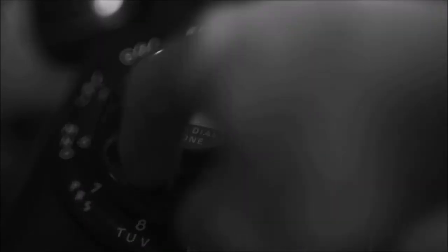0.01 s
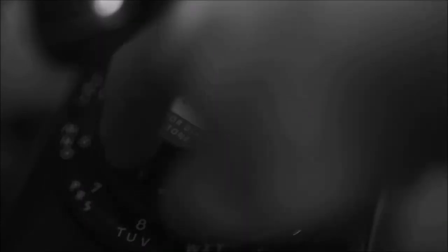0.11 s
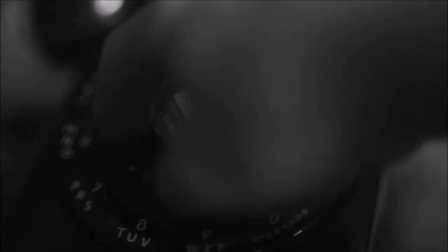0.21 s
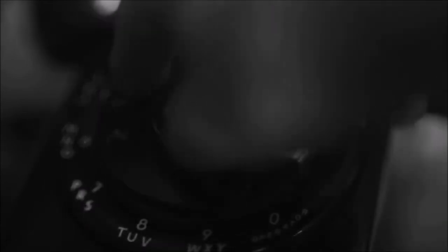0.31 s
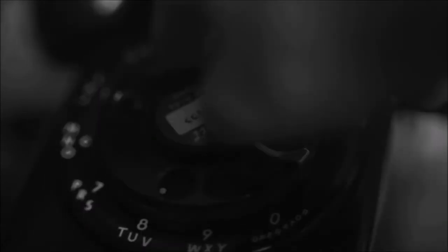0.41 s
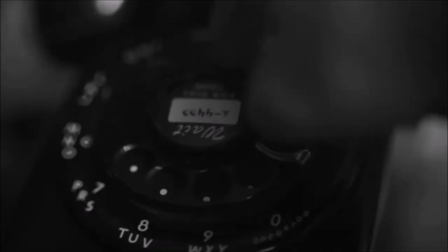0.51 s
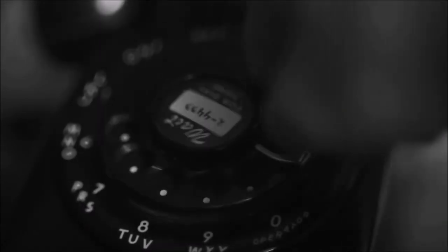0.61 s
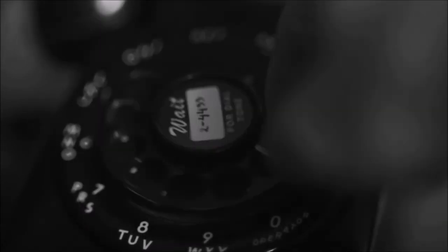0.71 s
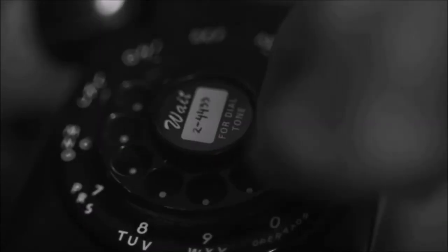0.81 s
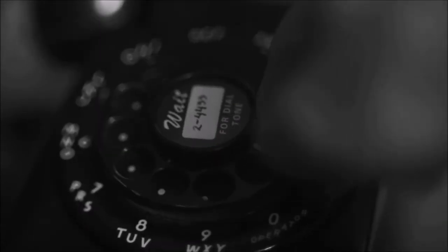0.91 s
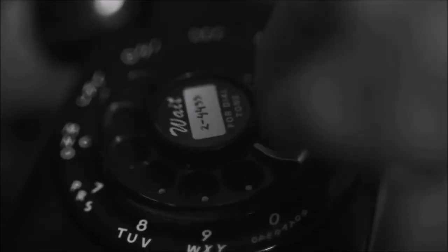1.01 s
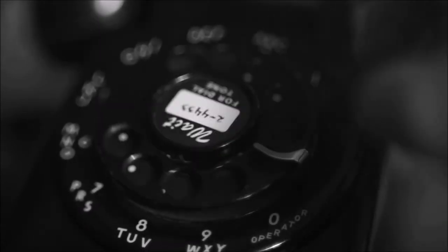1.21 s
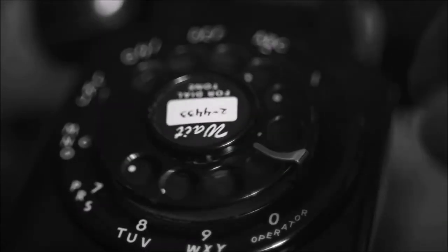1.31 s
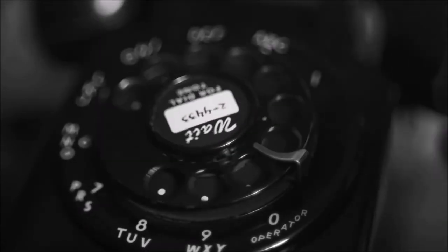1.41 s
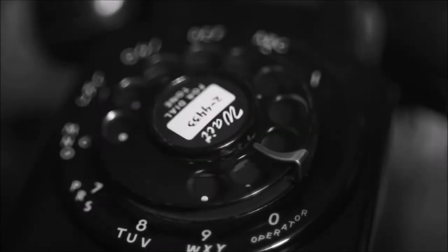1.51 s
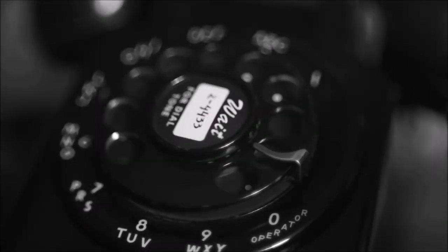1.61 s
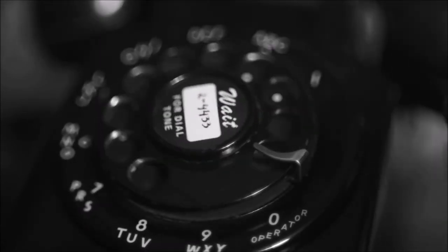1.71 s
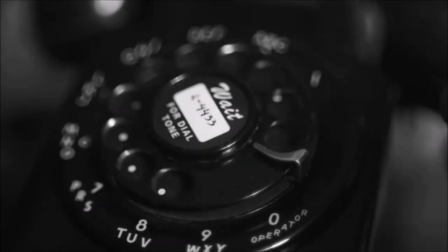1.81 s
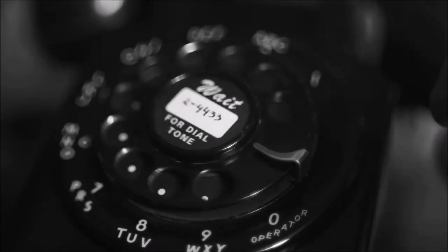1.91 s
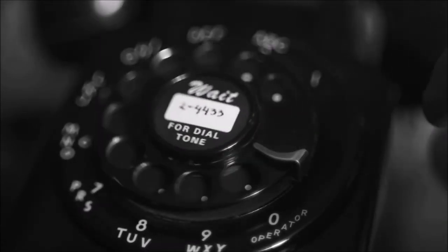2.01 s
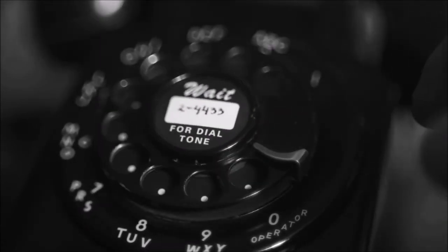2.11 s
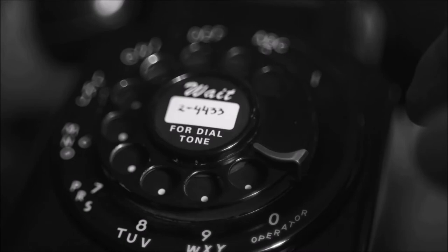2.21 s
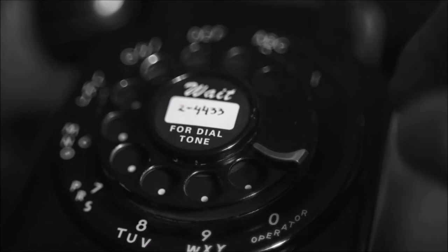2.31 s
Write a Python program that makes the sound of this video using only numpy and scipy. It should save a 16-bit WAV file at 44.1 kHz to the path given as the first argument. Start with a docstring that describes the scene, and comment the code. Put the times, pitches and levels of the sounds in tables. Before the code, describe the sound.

One digit dialed on a rotary phone: ratcheting wind-up, then a whirring, evenly clicking return.

```python
"""A ratchet clicks as a finger winds the wheel of an old rotary telephone to dial one digit.
The microphone is close by, in a small room with a faint mains hum. The finger meets the metal
finger stop and lets go. The wheel runs back on whirring gears, a contact snapping eight times
a second, and hits its rest stop with a thin metal ring and a soft thud of the case."""
import sys
import numpy as np
from scipy import signal
from scipy.fft import rfft, irfft, next_fast_len
from scipy.io import wavfile
from scipy.ndimage import uniform_filter1d, map_coordinates

SR = 44100
rng = np.random.default_rng(int(sys.argv[2]) if len(sys.argv) > 2 else 0)


def put_to_file(sound):
    """Save the sound as 16-bit audio at rate SR, in the file named by the first command-line argument."""
    columns = np.atleast_2d(sound).T  # one column per channel
    safe = np.clip(columns, -1, 1)
    whole_steps = np.round(safe * 32767)
    wavfile.write(sys.argv[1], SR, whole_steps.astype(np.int16))


N = 103635

# Resonances of the telephone's case. Each row: frequency in Hz, width in Hz, gain in dB.
CASE_MODES = [(426, 19, 7), (465, 23, 1), (532, 19, 5), (627, 51, -7), (785, 22, -5), (925, 69, -11),
              (1095, 35, -6), (1195, 50, -4.5), (1487, 28, -3), (1595, 35, -5), (1715, 52, -6),
              (1845, 37, 0), (1924, 180, -11.5)]


def amp(db):
    """Decibels to gain."""
    return 10 ** (np.asarray(db) / 20)


def unit(x):
    """Scaled to rms 1."""
    return x / np.sqrt(np.mean(x ** 2) + 1e-20)


def along(points, hz):
    """(Hz, value) points read on a log axis."""
    f, values = np.transpose(points)
    return np.interp(np.log(hz + 1), np.log(f + 1), values)


def envelope(points):
    """Gain per sample from (s, dB) points."""
    return amp(np.interp(np.arange(N) / SR, *np.transpose(points)))


def wobble(per_s):
    """A smooth random curve."""
    knots = rng.standard_normal(int(N * per_s / SR) + 4)
    return map_coordinates(knots, [np.arange(N) * per_s / SR])


def filtered(x, response):
    """x times a response of frequency."""
    size = next_fast_len(N + SR // 2)
    return irfft(rfft(x, size) * response(np.fft.rfftfreq(size, 1 / SR)), size)[:N]


def coloured(x, tone):
    """x filtered by a curve of (Hz, dB) points, at rms 1."""
    return unit(filtered(x, lambda hz: amp(along(tone, hz))))


def impulse(db):
    """The minimum-phase response that has the given spectrum."""
    cepstrum = irfft(np.log(amp(db)))
    half = len(cepstrum) // 2
    cepstrum[1:half] *= 2
    cepstrum[half + 1:] = 0
    return irfft(np.exp(rfft(cepstrum)))


def add(track, s, sound):
    """Mix a sound in at time s."""
    part = track[max(0, round(s * SR)):][:len(sound)]
    part += sound[:len(part)]


def resonances(modes, f):
    """Response of a body with the given (Hz, width, dB) resonances."""
    return sum((-1) ** k * amp(db) * 1j * f * width / (hz * hz - f * f + 1j * f * width)
               for k, (hz, width, db) in enumerate(modes))


def frame_db(hz):
    """The metal frame's resonances colour the parts mounted on it."""
    # Each row: frequency in Hz, width in Hz, boost in dB.
    modes = [(2934, 670, 10), (4680, 74, 11.5), (6720, 240, 5), (7410, 240, 10.5), (7600, 140, 9),
             (8900, 400, 13.5), (9460, 320, 9), (10770, 530, 5.5), (11070, 260, 7), (12350, 210, -1),
             (14200, 1000, 0.5)]
    return sum(db / (1 + (2 * (hz - centre) / width) ** 2) for centre, width, db in modes)


def room(x, wet_db, wall_s=0.0238, wall_db=-22):
    """Direct sound at the microphone, the nearest wall's echo and a tail whose treble dies first."""
    # Each row: frequency in Hz, t60 in seconds.
    decay = [(200, 0.19), (1500, 0.24), (7000, 0.16), (14000, 0.11)]
    hz, t, spectra = signal.stft(rng.standard_normal(SR // 3), SR, nperseg=256)
    tail = signal.istft(spectra * amp(-60 * t / along(decay, hz)[:, None]), SR, nperseg=256)[1]
    tail *= np.clip(np.arange(len(tail)) / SR / 0.0015 - 1, 0, 1)
    tail *= amp(wet_db) / np.linalg.norm(tail)
    tail[0] = 1
    tail[round(wall_s * SR)] += amp(wall_db)
    return signal.fftconvolve(x, tail)


def teeth(per_s, spread_db):
    """A stream of tiny irregular impacts."""
    chance, size = rng.random(N), rng.standard_normal(N)
    return (chance < per_s / SR) * amp(spread_db * np.clip(size, -2, 2)) * rng.choice([-1, 1], N)


def clicks(rows, tone, rise_s, t60, wet_db, frame=0, vary_db=0):
    """Each contact is a brief rattle coloured by the struck part; a third column tilts its treble."""
    out, t, hz = np.zeros(N), np.arange(SR // 25) / SR, np.fft.rfftfreq(2048, 1 / SR)
    shape = (1 - np.exp(-t / rise_s)) * amp(-60 * t / t60)
    colour_db = along(tone, hz) + frame * frame_db(hz)
    for s, db, *tilt in rows:
        spectrum = rfft(shape * rng.standard_normal(len(t)))
        power = np.abs(uniform_filter1d(np.abs(spectrum) ** 2, size=45))
        rattle = irfft(spectrum / np.sqrt(power + 1e-12))  # flattened before it is coloured
        ripple_db = vary_db * unit(uniform_filter1d(rng.standard_normal(len(hz)), size=25))
        tilt_db = sum(tilt) * np.log2(1 + hz / 1000)
        hit = signal.fftconvolve(rattle[:len(t) // 2], impulse(colour_db + ripple_db + tilt_db))
        add(out, s, room(amp(db + 10.5) * hit / np.linalg.norm(hit), wet_db))
    return out


def room_tone(mains_hz=60, air_db=-56.5):
    """A steady mains hum over the quiet air of the room."""
    # Each row: multiple of the mains rate, rms level in dB.
    harmonics = [(2, -58), (3, -67)]
    # Each row: frequency in Hz, gain in dB.
    air_tone = [(25, -8), (60, -5), (130, 0.5), (200, -5), (300, -0.5), (520, -6), (750, -5), (1800, -13),
                (2600, -19), (4000, -19.5), (6000, -25.5), (9000, -30), (16000, -31)]
    t = np.arange(N) / SR
    hum = sum(np.sqrt(2) * amp(db) * np.sin(2 * np.pi * (k * mains_hz * t + rng.random()))
              for k, db in harmonics)
    return hum + amp(air_db) * coloured(rng.standard_normal(N), air_tone)


def hand(bump_hz=79, bump_width_s=0.0039):
    """The finger rubs in its hole; the hand rumbles and gives the telephone soft, ringless bumps."""
    # Each row: time in seconds, level in dB.
    pushes = [(.141, -42), (0.3942, -34)]
    rub_levels = [(0, -56), (.12, -69), (.21, -44.5), (.26, -55), (.32, -50.5), (.44, -53), (.55, -87),
                  (.8, -83), (.87, -72)]
    # Resonances of the finger wheel. Each row: frequency in Hz, width in Hz, gain in dB.
    wheel_modes = [(553.6, 21, 1.5), (778, 7.6, -2)]
    t = np.arange(N) / SR
    bumps = sum(amp(db) * np.exp(-((t - s) / bump_width_s) ** 2) * np.cos(2 * np.pi * bump_hz * (t - s))
                for s, db in pushes)
    rubbing = unit(filtered(teeth(per_s=1000, spread_db=3), lambda f: resonances(wheel_modes, f)))
    rumble = coloured(rng.standard_normal(N), [(15, -19), (42, -5), (80, -15), (140, -25), (300, -59)])
    return bumps + envelope(rub_levels) * (rubbing + amp(-8.5) * rumble)


def drag(middle_s=0.75, half_length_s=0.083, db=-49):
    """The wheel grinds as its spring tightens over the last stretch before the finger stop."""
    # Each row: frequency in Hz, width in Hz, gain in dB.
    modes = [(970, 100, 1), (1160, 76, 0)]
    grind = unit(filtered(teeth(per_s=900, spread_db=5), lambda f: resonances(modes, f)))
    swell = np.exp(-((np.arange(N) / SR - middle_s) / half_length_s) ** 4)
    return amp(db) * grind * swell


def squeak(pitch_hz=5150, waver=0.016):
    """A dry bearing squeaks hoarsely, wavering in pitch and strength."""
    hz = pitch_hz * (1 + waver * (0.6 * wobble(per_s=30) + 1.5 * wobble(per_s=900)))
    flicker = amp(3 * wobble(per_s=45) + 3 * wobble(per_s=400))
    return unit(np.sin(2 * np.pi * np.cumsum(hz) / SR) * flicker)


def frame_noise(tone, per_s, spread_db):
    """Tiny impacts of gear teeth, heard through the metal frame."""
    return coloured(filtered(teeth(per_s, spread_db), lambda f: amp(frame_db(f))), tone)


def gears(wind_start_s=0.175, wind_end_s=0.86):
    """Gears and governor shake the case and rasp; they scrape on winding and sizzle on the way back."""
    # Each row: time in seconds, level in dB.
    gear_levels = [(0, -59.5), (.12, -51), (.21, -46), (.26, -50.5), (.39, -42.5), (.46, -48.5), (.6, -51),
                   (.63, -43), (.68, -47), (.71, -47), (.8, -43), (.835, -72), (.87, -61), (.95, -54.5),
                   (1.0, -44), (1.25, -42), (1.325, -43), (1.35, -49.5), (1.39, -43.5), (1.65, -44.5),
                   (2.03, -45), (2.06, -49.5), (2.1, -84)]
    sizzle_levels = [(.93, -65), (.98, -60.5), (1.2, -59.5), (1.25, -52), (1.33, -58), (1.44, -63.5),
                     (1.58, -55), (1.71, -67), (1.85, -56), (1.99, -64), (2.06, -96)]
    # Each row: frequency in Hz, gain in dB.
    rasp_tone = [(200, -13), (400, 3), (800, -9), (1200, 0.5), (1900, 0), (2400, -12.5), (3600, -22.5),
                 (5000, -19.5), (6600, -12.5), (8200, -34), (9200, -33), (10300, -32), (16000, -35)]
    scrape_tone = [(1500, 0), (3000, -4), (5000, 1.5), (7000, 3), (8400, -2), (14000, -6.5), (16500, -6)]
    sizzle_tone = [(3000, -16.5), (4300, -23), (4900, 1.5), (5700, -8), (6600, -12), (8200, -18),
                   (9400, -9.5), (10300, -33), (15000, -21)]
    t = np.arange(N) / SR
    winding = np.clip(np.minimum(t - wind_start_s, wind_end_s - t) / 0.038, 0, 1)
    impacts = teeth(per_s=900, spread_db=5)
    whirr = unit(filtered(impacts, lambda f: resonances(CASE_MODES, f) * f ** 4 / (f ** 4 + 300 ** 4)))
    rasp = frame_noise(rasp_tone, per_s=900, spread_db=2) * amp(1.5 * wobble(per_s=30))
    scrape = frame_noise(scrape_tone, per_s=1300, spread_db=4) * winding
    sizzle = frame_noise(sizzle_tone, per_s=1600, spread_db=1) * amp(2.6 * wobble(per_s=48))
    returning = envelope(sizzle_levels) * (sizzle + amp(-8.5) * squeak())
    running = envelope(gear_levels) * (amp(-1.4) * whirr + amp(-5) * rasp + amp(-5.5) * scrape)
    return room(running + returning, wet_db=-9)[:N]


def governor():
    """The governor's weights chatter on the way back."""
    # Each row: start in seconds, level in dB.
    hits = [(1.092, -30), (1.098, -29), (1.328, -30), (1.954, -33)]
    # Each row: frequency in Hz, gain in dB.
    tone = [(300, -29), (1900, 17), (3500, -19), (5200, 10), (7500, -4), (8500, -23), (15000, -28)]
    return clicks(hits, tone, rise_s=0.002, t60=0.02, wet_db=-10, frame=0.9, vary_db=3)


def wheel_knocks():
    """The wheel knocks in its play as it is taken, is released and settles."""
    # Each row: start in seconds, level in dB.
    hits = [(.0902, -27.5), (.794, -27.5), (.969, -22.5), (.974, -29), (2.138, -41.5)]
    # Each row: frequency in Hz, gain in dB.
    tone = [(200, -20), (1200, -0.5), (1850, 9.5), (3300, -10), (6500, -4), (9000, -14.5), (15000, -20)]
    return clicks(hits, tone, rise_s=0.00024, t60=0.021, wet_db=-8)


def spring_pings(overtone_ratio=1.94, t60=0.026):
    """The ratchet's spring sings briefly and roughly, its pitch set by where it catches."""
    # Each row: start in seconds, level in dB, pitch in Hz.
    pings = [(0.287, -39, 6620), (.328, -33, 7800), (.355, -38, 6360), (0.373, -35, 7550),
             (.385, -34, 6680), (.397, -33, 7800), (.402, -34, 6500), (0.714, -28.5, 7400)]
    out, t = np.zeros(N), np.arange(SR // 20) / SR
    shape = (1 - np.exp(-t / 0.00041)) * amp(-60 * t / t60)
    for s, db, hz in pings:
        drift = 0.1 * np.cumsum(rng.standard_normal((2, len(t))), axis=1)
        tone = np.sin(2 * np.pi * hz * t + drift[0])
        overtone = amp(-14) * np.sin(2 * np.pi * hz * overtone_ratio * t + drift[1])
        add(out, s, room(amp(db) * shape * (tone + overtone), wet_db=-10))
    return out


def ratchet():
    """The ratchet clicks unevenly as the finger winds the wheel."""
    # Each row: start in seconds, relative level in dB, treble tilt in dB per octave.
    hits = [(.2168, -25.5, -0.5), (.233, -40, -1), (.2495, -28, -2.5), (.3005, -23.5, -2),
            (.312, -29.5, -9), (.3275, -38, 0), (.3745, -26, -2), (.384, -26.5, -7), (.3985, -29, -0.5),
            (.4415, -23.5, -3.5), (.4765, -28.5, -2), (.533, -22.5, -2), (.552, -32, 2), (.569, -29, 0),
            (.6215, -22.5, -0.5), (.6315, -28, -2.5), (.6415, -31, -2), (.6985, -22, -0.5),
            (.7125, -26, -6.5), (.7235, -31, 5), (.7715, -23, -5.5), (.781, -30, 7), (.806, -23.5, 2.5)]
    # Each row: frequency in Hz, gain in dB.
    tone = [(200, -31.5), (500, -11.5), (1900, -1.5), (2400, -10), (3500, -15.5), (4800, -4.5),
            (7300, -5.5), (8400, -12.5), (13000, -5), (15500, -16.5), (17000, -18)]
    return amp(1) * clicks(hits, tone, rise_s=0.0015, t60=0.014, wet_db=-4.5, frame=0.65, vary_db=3.4)


def finger_stop():
    """The finger meets the metal stop: the blow, its rebound, then the finger lifting."""
    # Each row: start in seconds, level in dB.
    hits = [(.7918, -10.5), (.7938, -28), (.8072, -21), (.885, -31), (.892, -41.5)]
    # Each row: frequency in Hz, gain in dB.
    tone = [(200, -59), (1300, -40), (1850, 0), (2500, -26), (4200, -18), (5500, -1.5), (6400, -7.5),
            (7000, 3), (7550, 7.5), (8200, -31), (8950, -2.5), (10200, -22), (16000, -52)]
    return clicks(hits, tone, rise_s=0.00022, t60=0.011, wet_db=-11.5)


def pulse_contact(bounce_delay_s=(0.007, 0.036)):
    """The contact snaps as the wheel runs back, and its spring bounces twice after each snap."""
    # Each row: start in seconds, relative level in dB, treble tilt in dB per octave.
    pulses = [(1.002, -26, -2), (1.1322, -23.5, 1), (1.2528, -24, -1.5), (1.3758, -22.5, -1),
              (1.498, -22.5, -1.5), (1.624, -21.5, -1.5), (1.751, -22.5, 1), (1.8786, -22, 0),
              (2.0103, -23, -1.5)]
    # Each row: frequency in Hz, gain in dB.
    tone = [(120, -41), (280, -8.5), (440, 1), (700, -7.5), (2000, -7.5), (3500, -15.5), (4100, -9),
            (5500, -9), (6600, -1), (7600, -11.5), (9600, -8), (11000, -7), (13000, -1), (14500, -11),
            (16500, -33)]
    snaps = clicks(pulses, tone, rise_s=0.0015, t60=0.01, wet_db=-4.5, frame=0.4, vary_db=3.3)
    bounces = [(s + rng.uniform(*bounce_delay_s), db - 15.5, tilt)
               for s, db, tilt in pulses for _ in range(2)]
    rattle = clicks(bounces, tone, rise_s=0.001, t60=0.015, wet_db=-8, frame=0.8, vary_db=4)
    return amp(2.5) * snaps + rattle


def case_thud(db, t60):
    """The case's lowest resonances swell and fade after a blow."""
    t = np.arange(SR // 4) / SR
    modes = sum(amp(db + mode_db - 60 * t / t60) * np.sin(2 * np.pi * (hz * t + rng.random()))
                for hz, _, mode_db in CASE_MODES if hz < 700)
    return modes * (1 - np.exp(-t / 0.0051))


def metal_ring(db):
    """The dial's metal parts ring on after a blow."""
    # Each row: frequency in Hz, relative level in dB, t60 in seconds.
    modes = [(5609, -25, .58), (6078, -19, .14), (7440, -15, .11), (7596, -2, .13), (7695, -3, .18),
             (7755, -8, .17), (8452, -14, .37), (9490, -13, .11), (9555, -12, .13), (11710, -26, .16),
             (13300, -21, .11)]
    t = np.arange(SR // 2) / SR
    return sum(amp(db + mode_db - 60 * t / t60) * np.sin(2 * np.pi * hz * t)
               for hz, mode_db, t60 in modes)


def rest_stop():
    """The wheel chatters against its rest stop; the last blow sets metal and case ringing."""
    # Each row: start in seconds, relative level in dB.
    hits = [(2.0651, -8), (2.0672, -5)]
    # Each row: frequency in Hz, gain in dB.
    tone = [(100, -66), (300, -54), (500, -24), (800, -20), (1400, -8), (1900, -3), (2400, -22),
            (3200, -10), (3900, -31), (4800, -8.5), (5300, -23.5), (6100, 1.5), (6700, -5.5), (7200, -3),
            (7650, 5), (8150, -17), (9400, -13), (11000, -23), (13100, -15), (14500, -31), (16500, -40)]
    out = amp(-2.5) * clicks(hits, tone, rise_s=0.0003, t60=0.0105, wet_db=-11)
    last_s = hits[-1][0]
    add(out, last_s, metal_ring(db=-26.5))
    add(out, last_s, case_thud(db=-37.5, t60=0.078))
    return out


def scene():
    """The telephone in a small room, close to a single microphone."""
    contacts = ratchet() + wheel_knocks() + finger_stop() + pulse_contact() + governor() + rest_stop()
    return (contacts + spring_pings() + gears() + drag() + hand() + room_tone())[None]


def record(dry):
    """The recorder keeps nothing above 15.8 kHz."""
    return filtered(dry[0], lambda hz: hz < 15800)[None]


dry = scene()
out = record(dry)
put_to_file(out)
```